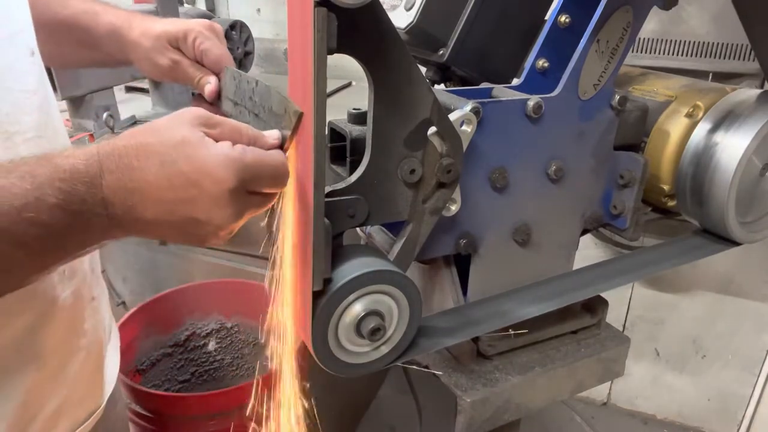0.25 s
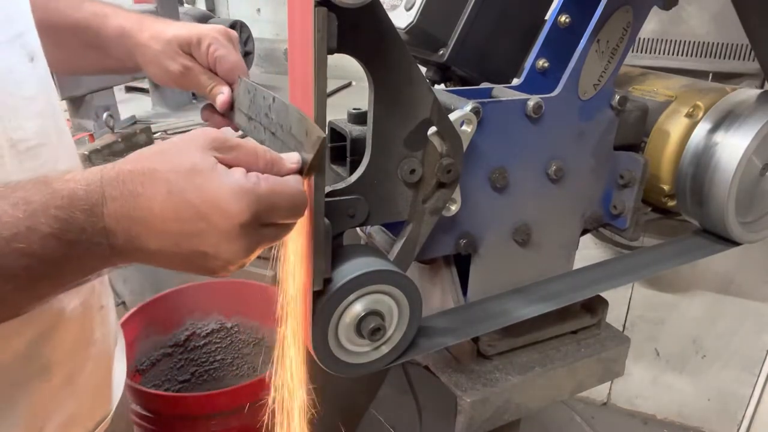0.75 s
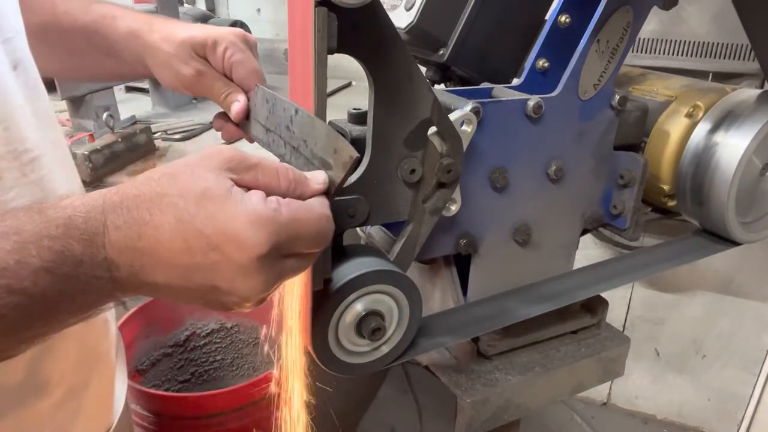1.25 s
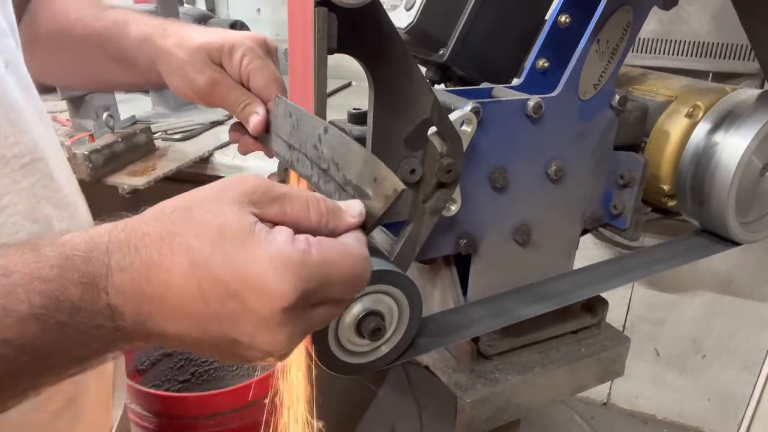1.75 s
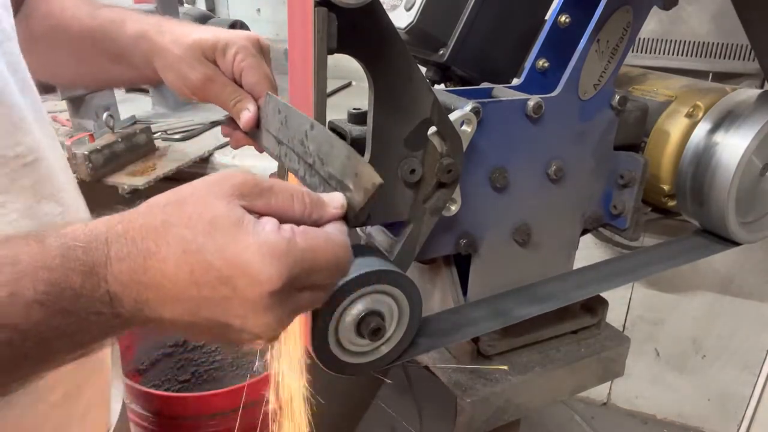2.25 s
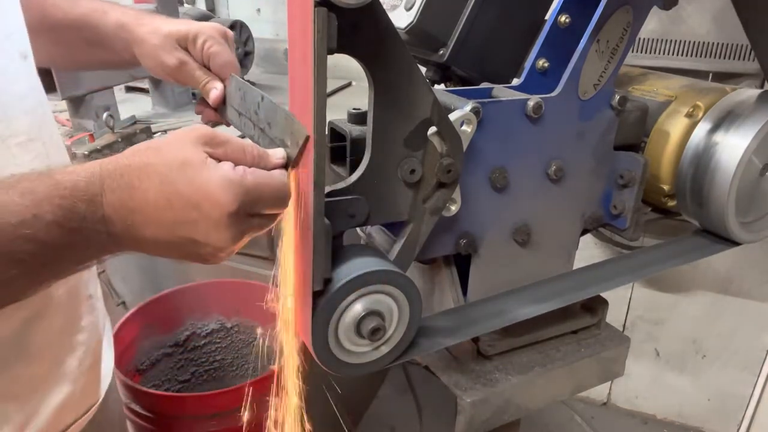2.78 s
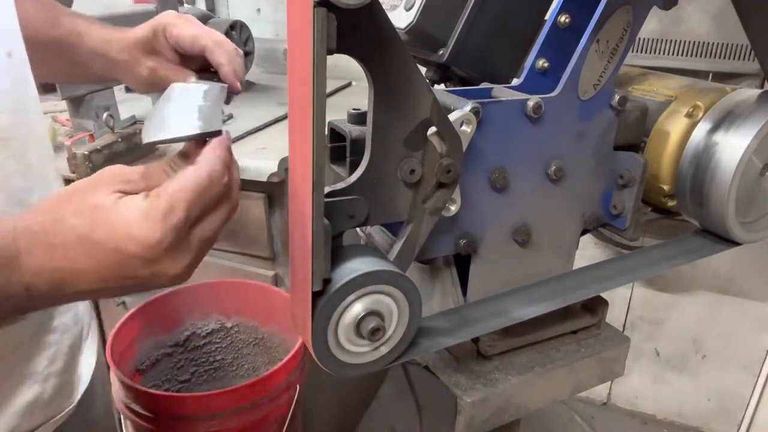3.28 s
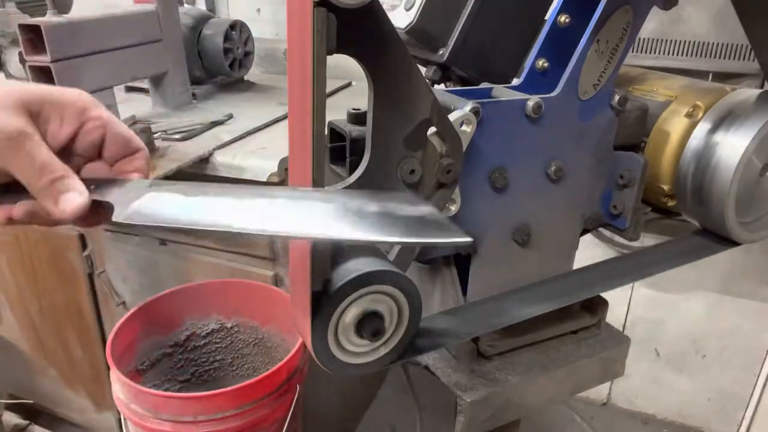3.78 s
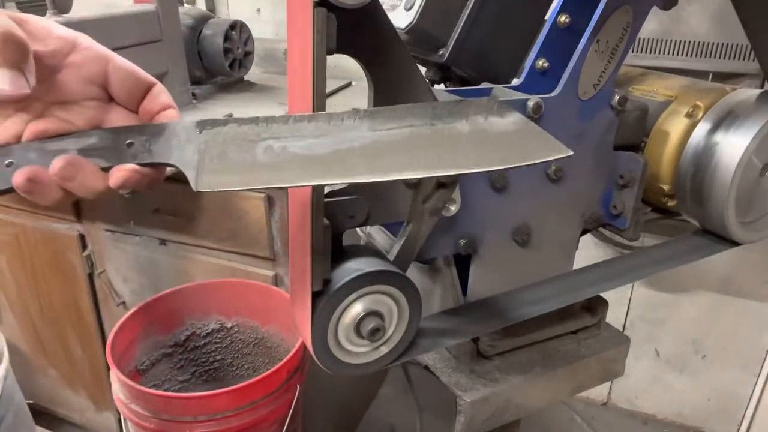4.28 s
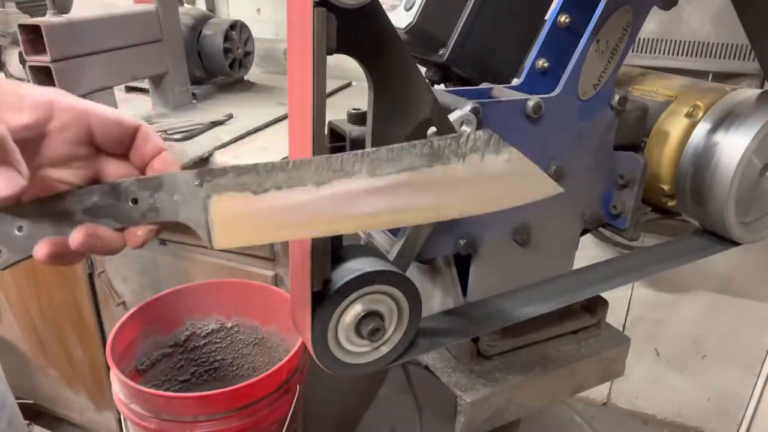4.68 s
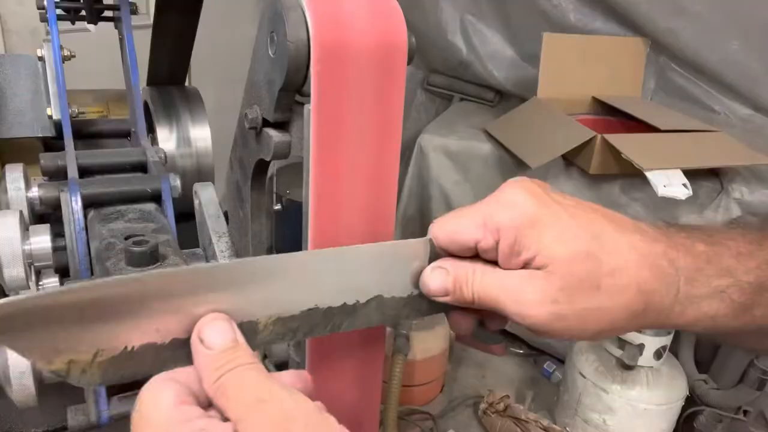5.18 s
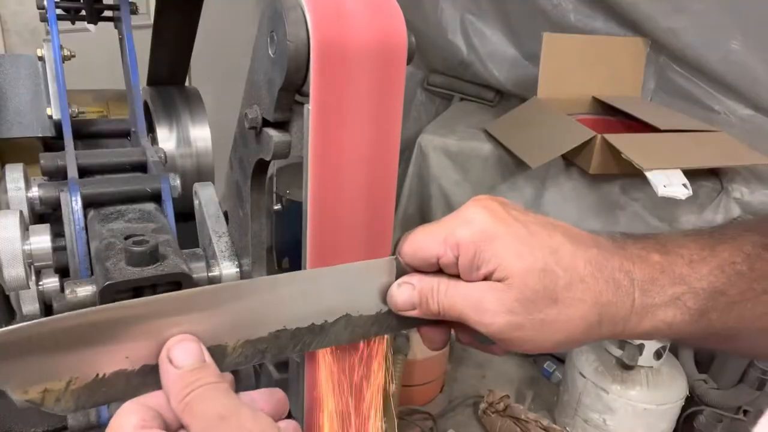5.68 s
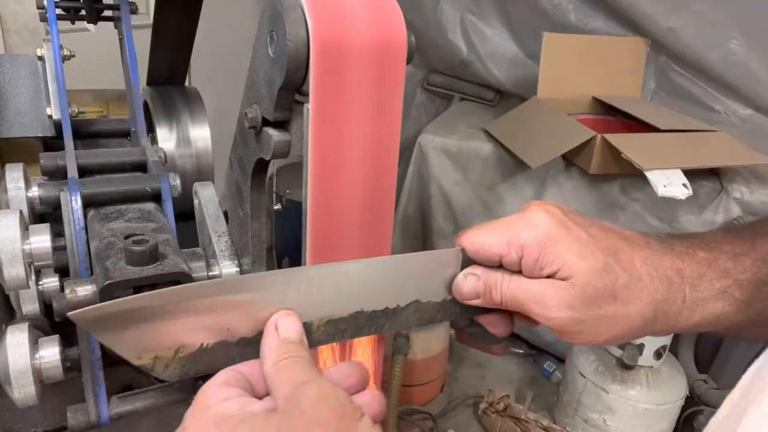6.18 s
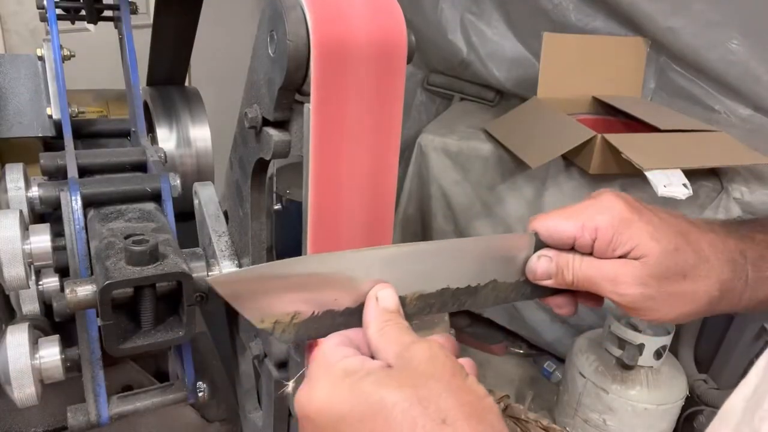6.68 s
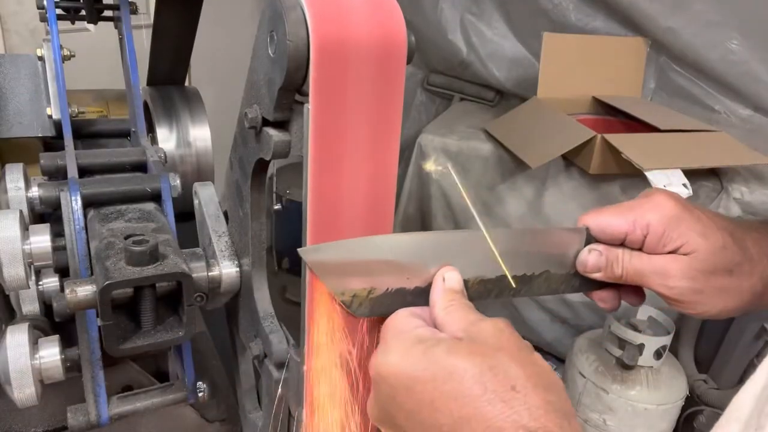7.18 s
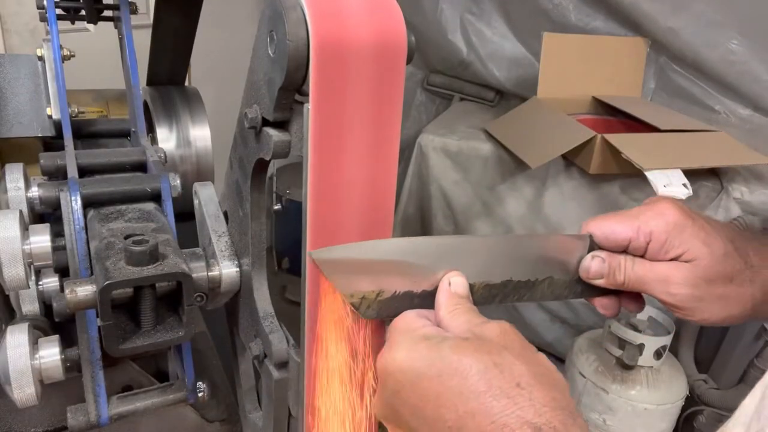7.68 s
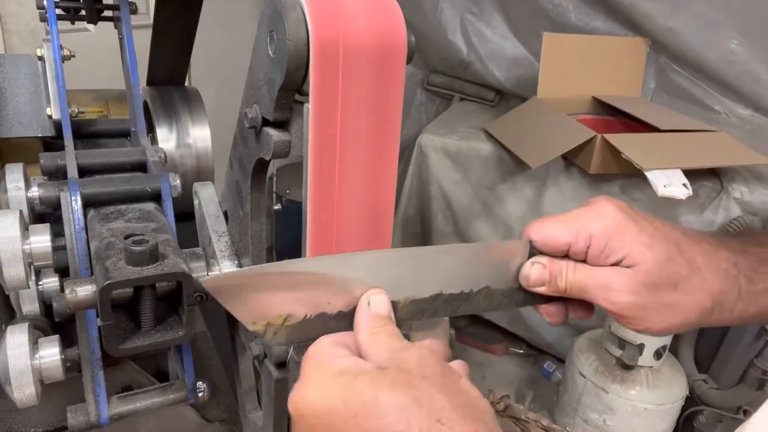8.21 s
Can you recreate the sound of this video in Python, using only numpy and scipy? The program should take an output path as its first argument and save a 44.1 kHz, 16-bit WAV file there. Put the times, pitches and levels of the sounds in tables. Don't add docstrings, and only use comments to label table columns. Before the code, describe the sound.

Bright abrasive belt hiss with low motor hum; a quiet steel cut, a free-running stretch, then a close, harsh, ringing grind.

```python
import sys
import numpy as np
from scipy import signal
from scipy.fft import rfft, irfft, next_fast_len
from scipy.io import wavfile
from scipy.ndimage import map_coordinates

SR = 44100
rng = np.random.default_rng(int(sys.argv[2]) if len(sys.argv) > 2 else 0)


def wav_out(sig):
    wavfile.write(sys.argv[1], SR, np.round(np.clip(np.atleast_2d(sig).T, -1, 1) * 32767).astype(np.int16))


def invert_db(x):
    u = np.asarray(x, float) / 20
    return 10 ** u


N = 372644
TIME = np.arange(N) / SR
HZ = np.maximum(np.arange(N // 2 + 1) * SR / N, 1)
TURN_S = .04287
FAR, NEAR = 0, 1


def in_time(rows):
    s, *columns = np.transpose(rows)
    return [invert_db(np.interp(TIME, s, c, left=-200, right=-200)) for c in columns]


def in_hz(points):
    hz, value = np.transpose(points)
    return np.interp(np.log(HZ), np.log(np.maximum(hz, 1)), value)


def rms_one(x):
    return x / np.sqrt(np.mean(x ** 2) + 1e-20)


def drift(rate_hz):
    r = np.exp(-80 * np.pi * rate_hz / SR)
    slow = signal.lfilter([1], [1, -2 * r, r * r], rng.standard_normal(N // 40 + 2002))[2000:]
    return np.interp(np.arange(N) / 40, np.arange(len(slow)), rms_one(slow))


def resonance(hz, width_hz):
    return 1 / (1 + (np.sqrt(2) - 1) * (2 * (HZ - hz) / width_hz) ** 2)


def body(colour, peaks, peak_db):
    power = invert_db(2 * in_hz(colour))
    for hz, width_hz, db in peaks:
        power = power + invert_db(2 * (db + peak_db)) * resonance(hz, width_hz) ** 2
    return np.sqrt(power)


def grit(returns, kept, wobble_samples):
    wobble_hz = 4.75
    size, kept = round(TURN_S * SR), np.clip(kept, 0, .99)
    fresh = rng.standard_normal((2, N // size + 40, size))
    turns = signal.lfilter([1], [1, -kept], fresh, axis=1)[:, 30:]
    wobble = wobble_samples * np.sin(2 * np.pi * wobble_hz * TIME)
    place = 100 + TIME * size / TURN_S + wobble
    looped = [rms_one(map_coordinates(t.ravel(), [place], order=3)) for t in turns]
    share = np.clip(in_hz(returns), 0, 1)
    new = rfft(rng.standard_normal((2, N)))
    return np.sqrt(share) * rfft(looped) + np.sqrt(1 - share) * new


def near_echoes():
    t60_s = .07
    response = rfft(rng.standard_normal(N) * invert_db(-60 * np.minimum(TIME / t60_s, 5)))
    return response / abs(response)


def two_ports(pair, view, apart):
    # f/Hz, likeness [0-1], right lead/rad
    ports = [
        [(60, .98, 0), (300, .88, -.1), (800, .7, -.3), (1600, .2, 1.5), (2500, .5, .3), (3400, .3, .8),
         (4400, .2, .3), (5500, .3, 1.6), (7500, .3, .8), (9000, .5, 2.7), (10150, .93, 3.14), (12300, .5, 6.1),
         (13500, .8, 3.14), (14400, .99, 3.14)],
        [(60, .97, 0), (650, .75, .1), (1200, .2, -2.5), (2900, .75, .2), (3700, .55, 3.1), (4150, .45, .5),
         (5350, .68, 3.1), (5900, .25, 1.2), (7250, .97, 3.14), (7900, .1, 5.0), (8720, .95, 3.14),
         (9500, .4, 6.2), (12300, .75, 6.28), (14800, .98, 3.14)],
    ]
    # f/Hz, left minus right/dB
    tilts = [
        [(60, 0), (380, 1), (1400, -3), (2400, -1), (6000, 0), (9500, 1.5), (13000, 0)],
        [(60, 0), (380, -1), (1000, -5), (2400, 0), (6000, -1.5), (10000, 0), (13000, -2.5), (14500, 0)],
    ]
    echo_share = .45
    hz, alike, lead = np.transpose(ports[view])
    alike = alike * (1 - np.clip(apart, 0, 1) * (hz > 13000))
    direct = alike * np.exp(1j * lead)
    direct = in_hz(np.c_[hz, direct.real]) + 1j * in_hz(np.c_[hz, direct.imag])
    other = np.sqrt(echo_share) * near_echoes() * pair[0] + np.sqrt(1 - echo_share) * pair[1]
    right = direct * pair[0] + np.sqrt(1 - abs(direct) ** 2) * other
    tilt = invert_db(in_hz(tilts[view]) / 2)
    return np.array([pair[0] * tilt, right / tilt])


def idle_belt(both, view):
    # t/s, level/dB
    levels = [
        [(0, -51.5), (1.4, -50), (2.9, -50), (3.0, -50), (3.5, -49.5), (3.8, -49), (4.4, -49), (5.2, -47.5)],
        [(5.2, -39), (5.5, -40.5), (5.8, -40), (6.8, -44), (7.6, -46.5), (8.0, -46.5), (8.45, -46)],
    ]
    # f/Hz, density/dB per Hz
    colours = [
        [(30, -44), (55, -22), (75, -9.5), (110, -15), (170, -21), (250, -12), (550, -18), (1000, -14.5),
         (2000, -16), (3000, -17), (4300, -15.5), (6000, -7), (8500, 1.5), (11000, 3), (13000, -3.5),
         (15600, 2)],
        [(30, -50), (60, -20), (100, -18), (250, -15), (700, -17), (1200, -17.5), (1850, -20.5), (2500, -14.5),
         (3300, -13), (4500, -13.5), (6000, -4), (8000, -1), (11500, -2.5), (15600, -1.5)],
    ]
    # f/Hz, width/Hz, level/dB
    peaks = [
        [(2469, 16, -5), (4070, 12, -4), (6710, 52, 0.5), (7010, 37, -2), (7200, 100, -3), (7520, 39, -18),
         (8560, 50, 4), (8240, 27, -24), (9200, 31, -12), (8700, 41, -4), (9460, 52, 7), (10580, 23, 10),
         (11000, 61, -12), (11400, 40, 2), (11900, 29, -13)],
        [(3210, 19, -7), (4250, 21, 0), (4995, 79, -3.5), (7070, 41, 9.5), (7460, 98, -9), (8940, 65, 5.5),
         (9700, 57, -18), (10100, 43, -4), (10000, 190, -3), (11300, 190, 2), (12760, 43, 8.5)],
    ]
    # f/Hz, rms level/dB
    hum = [
        [(175.8, -78.5), (403.7, -89.5), (490, -92), (540, -92), (1071, -83), (1351, -86), (1680, -85),
         (2099, -85), (2455, -79.5), (2686, -80)],
        [(176.5, -76.5), (350, -79.5), (403, -82.5), (468, -85.5), (630, -110), (2456, -66.5)],
    ]
    waver_db = .5
    hiss = rms_one(irfft(both * body(colours[view], peaks[view], peak_db=2.5), N))
    level, = in_time(levels[view])
    tones = 0
    for hz, db in hum[view]:
        gain = np.sqrt(2) * invert_db(db + waver_db * drift(1.4))
        tones = tones + gain * np.sin(2 * np.pi * hz * TIME + 7 * rng.random())
    running = level > invert_db(-100)
    return invert_db(4.5) * level * hiss * invert_db(0.5 * drift(8.4)) + tones * running


def pressure():
    lumps = sum(np.sin(2 * np.pi * (k * TIME / TURN_S + rng.random())) for k in range(1, 6))
    return invert_db(0.61 * drift(14.6) + .5 * lumps)


def contact(view):
    # t/s, force as rasp level/dB, edge bite/dB
    passes = [
        [(0.0, -59.5, -2), (0.27, -61.5, -2.5), (0.38, -60.5, 1), (1.07, -62, -3), (1.5, -59, -2),
         (1.95, -61, 1), (2.38, -61.5, -6.5), (2.68, -60, -1), (2.9, -59.5, -2.5)],
        [(5.44, -67.5, 10.5), (5.7, -64, 13.5), (5.82, -49.5, 0), (6.55, -48.5, 0), (6.92, -50, -1.5),
         (7.45, -53.5, 6), (7.7, -50.5, 0), (8.0, -54, 1.5), (8.45, -52, -6)],
    ]
    # t/s, half length/s, level/dB
    pushes = [(0.01, .03, 2), (1.09, 0.024, -1), (2.16, 0.027, 7), (2.22, 0.11, 6.5), (2.458, 0.054, 7),
              (6.365, 0.07, 7.5), (6.463, .05, 5.5), (6.495, .02, -1), (6.594, 0.035, 4.5),
              (6.638, .035, 8), (6.714, 0.064, 8), (6.755, 0.043, 7), (6.95, .1, -1.5), (7.125, 0.066, 9),
              (7.18, .04, 4), (7.258, 0.13, 8), (7.39, .03, 2.5), (7.457, .05, 1.5), (7.52, 0.03, 2),
              (7.59, .06, 2), (7.843, 0.05, 3), (7.974, 0.087, -6)]
    lift_db_per_s = 180
    fall_share = 0.69
    s, force_db, bite_db = np.transpose(passes[view])
    away_s = np.maximum(s[0] - TIME, 0) + np.maximum(TIME - s[-1], 0)
    push_db = 0
    for at, half, db in pushes:
        rise = 1 + (TIME - at) / half
        fall = 1 - (TIME - at) / (half * fall_share)
        push_db = push_db + db * np.clip(np.minimum(rise, fall), 0, 1)
    force = invert_db(np.interp(TIME, s, force_db) - lift_db_per_s * away_s)
    return force, np.interp(TIME, s, bite_db), push_db


def rasp(both, view):
    centres_hz = [800, 3000, 7000, 11000]
    # offset/dB, share of bite [dB/dB], share of push [dB/dB]
    ranges = [
        [(-10.5, 0.1, 0.51), (-1.2, 0.046, 0.29), (6, 0.68, 0.59), (10.5, 1.2, 0.9)],
        [(-17.5, -0.23, 0.18), (-0.46, 0.14, 0.091), (5.5, 1.1, 0.75), (10.5, 1.17, 0.62)],
    ]
    # f/Hz, density/dB per Hz
    colours = [
        [(110, -29), (200, -15.5), (400, -20.5), (600, -31), (1000, -10), (1700, -15), (2300, -13), (3500, -9),
         (5200, -4), (6700, -6), (8600, 7.5), (11000, 9.5), (13000, -1), (15600, -6)],
        [(200, -26), (400, -33), (900, -18.5), (1800, -22.5), (2500, -25.5), (3600, -6), (4300, -6),
         (5200, -13), (6500, -8), (8500, 3), (11000, -3.5), (13000, 8.5), (15600, -2.5)],
    ]
    # f/Hz, width/Hz, level/dB
    peaks = [
        [(970, 29, -3), (2067, 53, -9), (2627, 87, -5), (3060, 260, -8.5), (3680, 47, -19), (3900, 66, -16),
         (4400, 45, -1), (4900, 110, -19), (5730, 250, -6.5), (6800, 29, 2), (7200, 46, -2), (7400, 170, -1),
         (8480, 80, 4), (9300, 49, -8), (10700, 330, -18)],
        [(1597, 150, -18), (2077, 43, -9), (2400, 31, -14), (2750, 400, -8), (4070, 79, -1.5), (4650, 160, -12),
         (5720, 59, -5.5), (6730, 320, -0.5), (7110, 42, -15), (8200, 68, -19), (8670, 41, -10),
         (9490, 72, -14), (9900, 90, 2), (11700, 120, -10), (13200, 290, -19)],
    ]
    whole = both * body(colours[view], peaks[view], peak_db=1.5)
    force, bite_db, push_db = contact(view)
    out = 0
    for one, (db, bites, pushed) in zip(np.eye(len(centres_hz)), ranges[view]):
        part = in_hz(list(zip(centres_hz, one)))
        gain = force * invert_db(db + bites * bite_db + pushed * push_db)
        out = out + gain * rms_one(irfft(whole * part, N))
    return out


def swells(modes, view, cap_db):
    swell_db, shape = 13.5, 1.05
    soft_cap = 4
    force = contact(view)[0]
    cap = force * invert_db(cap_db) + 1e-12
    levels = []
    for rest_db, rows in modes:
        power = (force * invert_db(rest_db)) ** 2
        for s, half, db in rows:
            power = power + invert_db(2 * (db - swell_db * (abs(TIME - s) / half) ** shape))
        level = np.sqrt(power)
        levels.append(level / (1 + (level / cap) ** soft_cap) ** (1 / soft_cap))
    return levels


def ring_modes(both, modes, levels, gain_db):
    out = 0
    for (hz, width_hz), level in zip(modes, levels):
        tone = rms_one(irfft(both * resonance(hz, width_hz), N))
        out = out + invert_db(gain_db + 1.0 * drift(14.0)) * level * tone
    return out


def blade(steel, view):
    # f/Hz, width/Hz
    free_modes = [
        [(700, 18), (4090, 85), (6000, 170), (8240, 72)],
        [(8000, 270), (9480, 140), (10480, 105), (11950, 190)],
    ]
    # f/Hz, width/Hz
    bend_modes = [
        [(490, 23), (1260, 91), (955, 110)],
        [(1030, 130), (860, 83), (726, 77), (700, 11), (958, 11), (914, 7.1)],
    ]
    # t/s, half length/s, peak level/dB
    ring_far = [
        (-26.5, [(.85, 0.32, -74.5), (1.3, 0.34, -75), (2.45, 0.21, -80)]),
        (-13.5, [(.3, 0.52, -60), (.95, 0.37, -65), (1.6, 0.21, -59.5), (2.23, 0.16, -57.5), (2.67, 0.085, -65.5)]),
        (-8, [(1.45, 0.56, -61), (1.86, 0.47, -58.5), (2.17, 0.088, -51.5), (2.36, .08, -57), (2.65, .1, -63)]),
        (-7, [(.3, .15, -59), (1.15, 0.61, -60.5), (1.54, 0.39, -54), (2.23, 0.075, -50), (2.41, .1, -53.5)]),
    ]
    ring_near = [
        (-10, [(6.31, 0.14, -42), (6.73, 0.12, -42.5), (7.04, 0.13, -45.5), (7.33, 0.33, -43.5), (7.55, 0.12, -40.5), (7.84, .08, -53)]),
        (-16, [(5.89, 0.18, -45), (6.34, .1, -51), (7.2, 0.18, -35.5), (7.5, .3, -46)]),
        (-2.5, [(5.73, 0.14, -48), (6.07, 0.23, -54), (6.34, 0.21, -46), (6.66, 0.19, -38.5), (7.05, .15, -46), (7.24, .15, -44), (7.84, 0.056, -40), (8.08, .12, -53)]),
        (-7.5, [(5.52, .25, -38), (5.89, .2, -48), (7.22, 0.23, -38)]),
    ]
    bend_far = [
        (-41, [(.95, 0.21, -69), (2.45, 0.11, -67)]),
        (-27, [(.95, 0.27, -70), (1.8, 0.32, -67), (2.3, .15, -74), (2.64, 0.23, -68)]),
        (-17, [(.15, 0.6, -76), (2.1, 0.18, -63.5), (2.55, 0.25, -70)]),
    ]
    bend_near = [
        (-21.5, [(5.8, 0.35, -48), (6.15, 0.49, -58.5), (8.05, 0.18, -60.5)]),
        (-23, [(6.1, .4, -67), (6.9, .55, -61.5), (8.15, 0.8, -71)]),
        (-29, [(6.9, 0.6, -70.5), (8.4, 0.51, -69)]),
        (-34, [(5.75, .15, -70), (6.5, .3, -69), (7.45, .4, -76)]),
        (-30, [(6.1, 0.65, -58.5)]),
        (-30, [(6.3, .8, -71), (8.2, 0.63, -64)]),
    ]
    ring_width = [
        0.81,
        0.57,
    ]
    ring, bend = [(ring_far, bend_far), (ring_near, bend_near)][view]
    mid = steel.mean(axis=0)
    thin = mid + ring_width[view] * (steel - mid)
    ringing = ring_modes(thin, free_modes[view], swells(ring, view, cap_db=12.5), gain_db=1.5)
    bending = ring_modes(steel, bend_modes[view], swells(bend, view, cap_db=-2.5), gain_db=-4.0)
    return ringing + bending


def hands(x):
    echo_db, delay_s, move_s = -19, .0016, .00012
    path = drift(1.2) + .2 * np.array([drift(2.), drift(2.)])
    place = (TIME - delay_s - move_s * path) * SR
    echo = np.array([map_coordinates(c, [p], order=1) for c, p in zip(x, place)])
    return x + invert_db(echo_db) * echo


def shade(x, rows):
    edge_s = .06
    out = x.copy()
    for start, end, hz, width_hz, db in rows:
        part = slice(max(int((start - .2) * SR), 0), int((end + .2) * SR))
        size = next_fast_len(len(x[part]))
        bin_hz = np.arange(size // 2 + 1) * SR / size
        bell = np.exp(-2.0 * ((bin_hz - hz) / width_hz) ** 2)
        on = np.clip(np.minimum(TIME[part] - start, end - TIME[part]) / edge_s + .5, 0, 1)
        band = irfft(rfft(out[part], size) * bell, size)[:len(on)]
        out[part] += (invert_db(db * on) - 1) * band
    return out


def flicker(x):
    # f/Hz, width/Hz, spread/dB
    ranges = [(13900, 500, 3), (14400, 500, 5), (14900, 500, 6), (15400, 500, 6), (10900, 250, 4),
              (10100, 300, 3), (8700, 250, 2)]
    rate_hz = 7
    size = next_fast_len(N)
    whole, bin_hz = rfft(x, size), np.arange(size // 2 + 1) * SR / size
    out = x
    for hz, width_hz, db in ranges:
        gain = invert_db(db * drift(rate_hz) - db ** 2 / 9)
        band = irfft(whole * np.exp(-2 * ((bin_hz - hz) / width_hz) ** 2), size)[:N]
        out = out + (gain - 1) * band
    return out


def shifting_ranges(x):
    # start t/s, end t/s, f/Hz, width/Hz, level/dB
    shade_far = [(0.0, 5.2, 216, 39.8, -9), (0.0, 3.5, 1140, 100, -7), (0.0, 2.9, 2000, 120, 2.5),
                 (0.0, 2.9, 2480, 100, 1), (0.0, 2.8, 15000, 500, 4), (0.0, 2.3, 14200, 500, 4),
                 (.45, .72, 13900, 700, -8), (0.0, 3.4, 13750, 300, 10), (.78, 1, 490, 45, 2.5),
                 (1.45, 2.1, 3420, 300, 1), (3.42, 3.56, 4450, 400, -6.5), (3.9, 4.4, 4400, 350, -6),
                 (1.1, 1.5, 14400, 500, 9), (1.62, 1.85, 14650, 400, 13), (2.05, 2.3, 14500, 400, 10),
                 (1.4, 2.9, 840, 120, 4), (1.4, 3.4, 10000, 400, 2), (2.95, 5.2, 640, 80, -4.5),
                 (2.95, 5.2, 3900, 1000, 2.5), (2.95, 5.2, 3720, 150, -3), (2.95, 5.2, 4250, 120, -2),
                 (2.95, 4.5, 9200, 250, 4), (0.0, .55, 10200, 300, 0), (4.08, 4, 10100, 350, -7),
                 (4.8, 4.8, 9910, 400, -8), (1.15, 1.36, 4520, 250, -5), (1.2, 1.9, 10100, 400, -5),
                 (1.2, 2.3, 7300, 500, 0), (1.5, 2.4, 1760, 250, -4.5), (1.9, 2.1, 4330, 300, -10),
                 (1.9, 2.4, 9400, 250, -4), (2.0, 2.2, 10000, 400, -7), (2.3, 2.45, 4400, 300, -6),
                 (4.3, 6, 4600, 250, 4), (2.95, 3.15, 4550, 300, 2), (4.4, 4.5, 2300, 200, 5),
                 (2.95, 5.2, 2850, 400, 1), (3.0, 4.4, 10030, 500, 1)]
    # start t/s, end t/s, f/Hz, width/Hz, level/dB
    shade_near = [(5.2, 5.697, 3780, 150, -7), (5.2, 6.298, 2600, 100, -6), (5.2, 6.3, 2160, 350, 3),
                  (5.2, 5.55, 8400, 500, 3), (5.2, 7.7, 12550, 460, 2.5), (5.7, 6.3, 10400, 250, -4),
                  (5.748, 6.3, 1660, 470, 4), (5.748, 6.3, 4700, 340, 4), (6.3, 7.6, 7250, 250, 4),
                  (6.4, 7.0, 1700, 770, -3), (7.0, 7.7, 1180, 200, -3.5), (7.0, 7.7, 2540, 120, -8),
                  (7.0, 7.7, 12700, 960, -5.5), (5.203, 5.753, 3550, 180, 7), (5.2, 5.7, 3180, 220, -4),
                  (5.2, 5.7, 2700, 140, 5.5), (5.58, 5.75, 5430, 350, -7), (5.2, 5.75, 7400, 350, -2),
                  (5.2, 5.6, 4600, 200, -7), (6.12, 6.32, 9200, 350, -9), (5.75, 6.6, 10950, 600, 2.5),
                  (5.75, 6.6, 9950, 400, 2.5), (6.38, 6.63, 5200, 300, -7), (6.3, 7.0, 3680, 300, -6),
                  (5.8, 8.45, 3220, 170, 3.5), (6.902, 7.702, 4570, 250, 4.5), (6.97, 7.11, 7200, 410, -10),
                  (6.85, 7.05, 3700, 300, -2), (7.05, 7.66, 3580, 350, -8), (7.6, 7.75, 3380, 250, -6),
                  (7.06, 7.37, 8400, 470, -12), (7.93, 8.02, 7150, 400, -4), (8.1, 8.45, 7300, 300, 4),
                  (7.2, 7.62, 7300, 350, -7), (7.24, 7.4, 5400, 440, -14), (8.1, 8.45, 5200, 300, -3),
                  (8.1, 8.34, 3750, 250, -8), (7.7, 7.9, 3600, 390, -8), (6.3, 8.45, 8800, 300, 3),
                  (5.2, 8.45, 15250, 700, 8.5),
        (5.2, 5.6, 14400, 500, -9.0),
        (6.0, 6.1, 15300, 700, 3),
        (6.58, 6.75, 15300, 800, 4),
        (6.76, 7.25, 14600, 700, -5.0),
        (7.87, 8.05, 14400, 700, -6.0),
    ]
    # start t/s, end t/s, f/Hz, width/Hz, level/dB
    shade_apart = [(1.2, 2.9, 3400, 300, 5), (0.0, 5.2, 11000, 1500, -3.5), (2.9, 5.2, 2750, 600, 8),
                   (2.9, 4.8, 9300, 900, -7), (2.9, 5.2, 15000, 1490, -3), (0.0, 5.2, 15600, 300, -3),
                   (0.0, 2.9, 13900, 700, 4.5), (6.4, 8.45, 15400, 500, 3), (5.2, 5.75, 2860, 350, 5),
                   (5.2, 5.75, 3300, 298, -6), (5.2, 5.8, 6000, 2200, -6), (5.2, 6.7, 1350, 800, 3),
                   (5.2, 6.8, 10800, 2020, 5), (5.2, 7, 13100, 250, -4), (5.75, 9.3, 5160, 500, -1.5),
                   (5.75, 11, 3880, 300, -6), (6.8, 7.8, 9500, 350, -7), (6.8, 8.3, 10700, 800, 6.5),
                   (6.8, 7.8, 1880, 400, -7), (6.8, 7.8, 8000, 300, -6)]
    common = shade(flicker((x[0] + x[1]) / 2), shade_far + shade_near)
    apart = shade((x[0] - x[1]) / 2, shade_apart)
    return np.array([common + apart, common - apart])


def scene():
    # f/Hz, share [0-1]
    idle_returns = [(25, 0.7), (300, 0.25), (3000, 0.7), (15000, 0.89)]
    # f/Hz, share [0-1]
    rasp_returns = [(300, 0.79), (2000, 0.71), (4500, 0.84), (8000, 0.2), (15000, 0)]
    blade_apart = [
        0.26,
        0.033,
    ]
    change_s, fade_s, sway_db = 5.2, 0.038, .4
    free = grit(idle_returns, kept=0.92, wobble_samples=0.95)
    cutting = grit(rasp_returns, kept=0.82, wobble_samples=0.54)
    ringing = grit(rasp_returns, kept=0.97, wobble_samples=1.0)
    force = pressure()
    out = 0
    for view in (FAR, NEAR):
        belt = two_ports(free, view, apart=0)
        cut = two_ports(cutting, view, blade_apart[view])
        steel = two_ports(ringing, view, apart=0)
        out = out + idle_belt(belt, view) + force * (rasp(cut, view) + blade(steel, view))
    sway = invert_db(sway_db * drift(2.3) * np.array([[1], [-1]]))
    fade = np.clip(abs(TIME - change_s) / fade_s, .03, 1)
    return shifting_ranges(hands(out) * sway) * fade


def top_cut(x):
    return signal.sosfilt(signal.butter(12, 15735, fs=SR, output="sos"), x)


def record(dry):
    low_cut_hz, top_cut_hz = 85, 15760
    dry = signal.sosfilt(signal.butter(2, low_cut_hz, "high", fs=SR, output="sos"), dry)
    dry = signal.sosfilt(signal.ellip(12, .3, 70, top_cut_hz, fs=SR, output="sos"), dry)
    return top_cut(dry)


dry = scene()
out = record(dry)
wav_out(out)
```